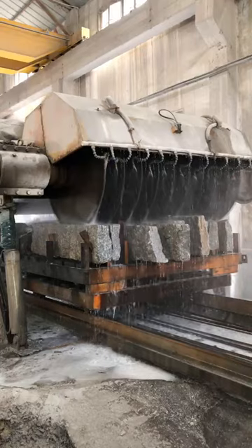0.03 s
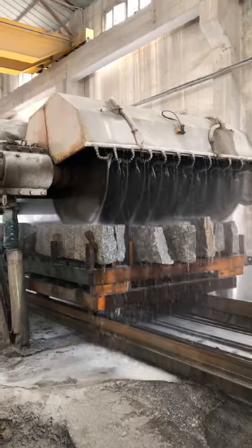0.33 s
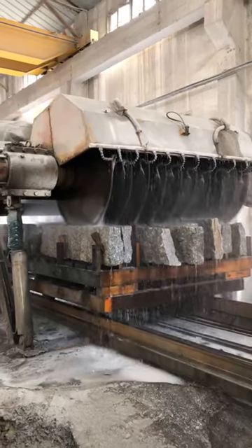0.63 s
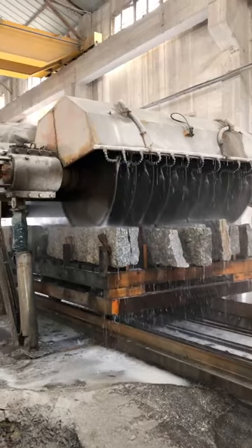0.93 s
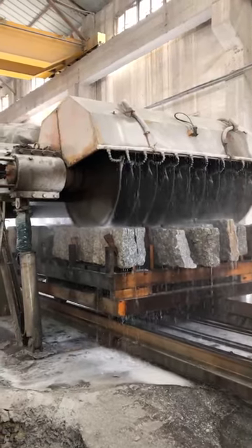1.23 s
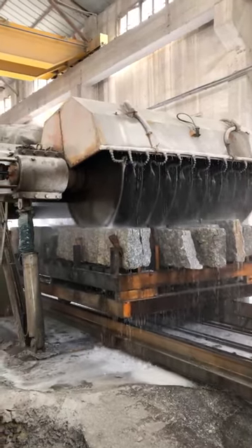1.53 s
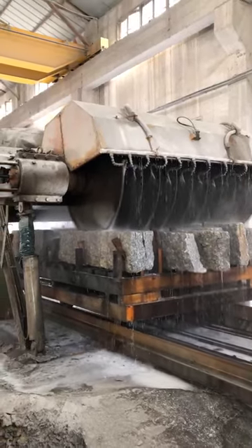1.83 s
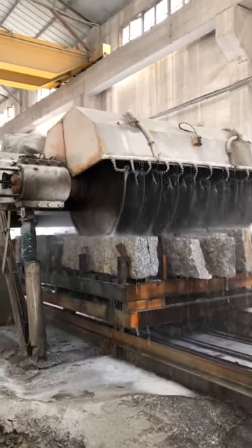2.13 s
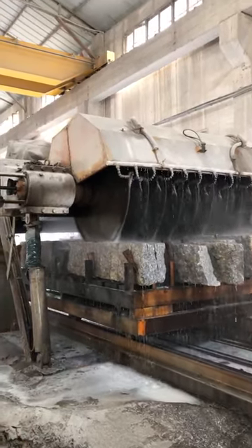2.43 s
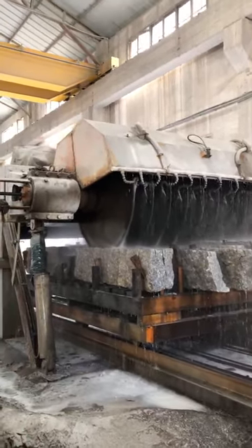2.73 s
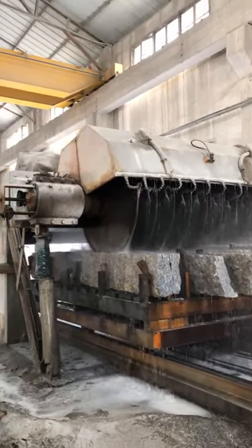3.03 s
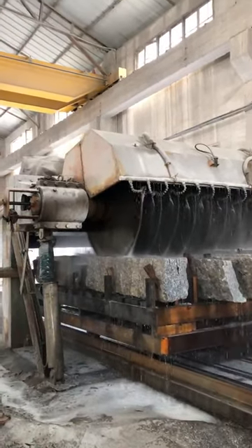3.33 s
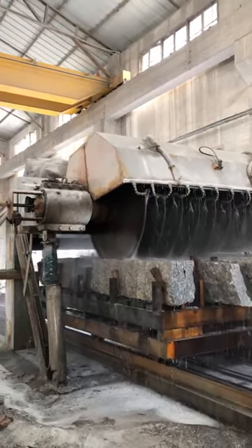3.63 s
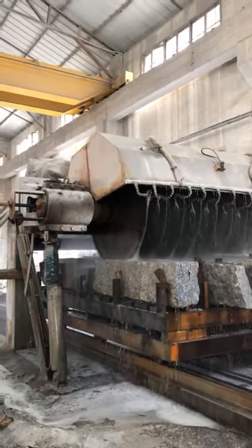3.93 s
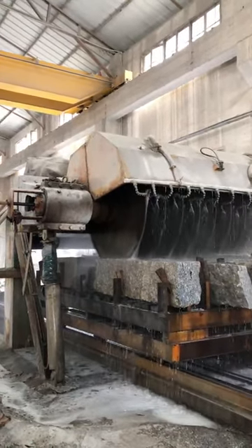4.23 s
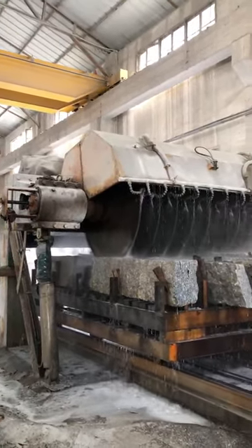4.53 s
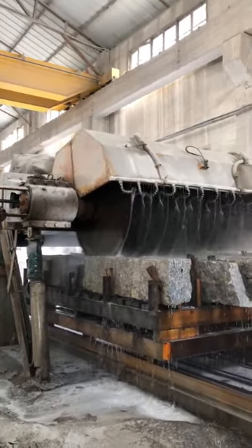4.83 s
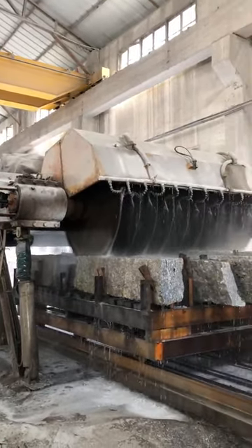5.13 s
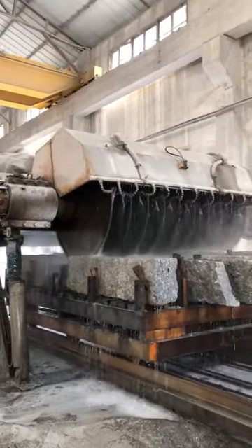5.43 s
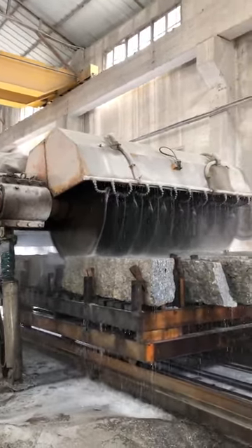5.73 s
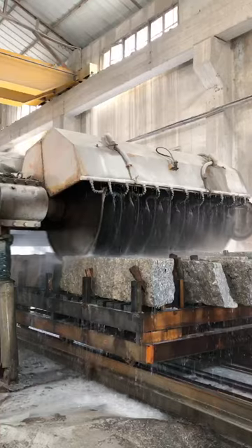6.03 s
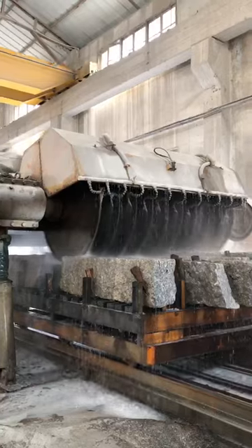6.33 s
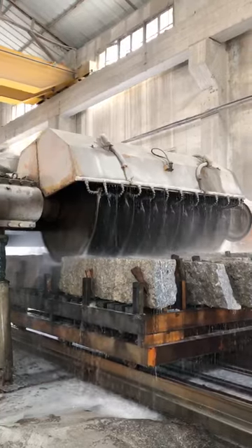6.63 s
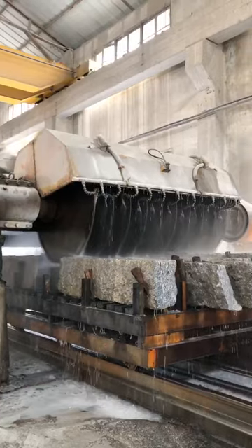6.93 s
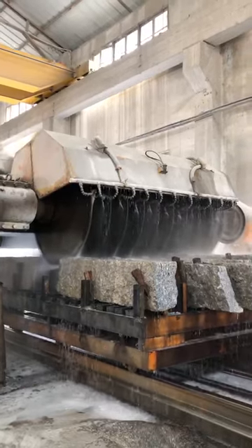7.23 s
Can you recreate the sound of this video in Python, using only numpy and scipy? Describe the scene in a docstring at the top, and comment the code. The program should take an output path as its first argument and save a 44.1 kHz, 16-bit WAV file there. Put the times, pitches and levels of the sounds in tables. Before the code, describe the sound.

A large multi-blade circular saw cuts granite under running water in a concrete hall. A harsh, gritty rasp runs from start to finish, fluttering slightly, with bright spray hissing off the blades and the steel discs rattling. Underneath, the shaft hums, the motor whines faintly, one disc sings on and off, and the frame gives a few soft low groans. The sound stays centred and nearly constant in level.

```python
"""Wet saw cutting granite

A multi-blade circular saw grinds through granite under running water, in a concrete hall.
The segments bite in a pattern that returns with every turn and shakes frame, hood and discs.
Crushed grit rasps in fluttering surges and spray hisses off the rims. Underneath, the shaft hums,
the motor whines, one disc sings on and off, and the frame gives brief low groans."""
import sys
import numpy as np
from scipy import signal
from scipy.fft import rfft, irfft
from scipy.io import wavfile
from scipy.ndimage import uniform_filter1d

SR = 44100
rng = np.random.default_rng(int(sys.argv[2]) if len(sys.argv) > 2 else 0)


def master_out(mix):
    """Clip the mix to full scale and print it as 16-bit PCM to the path in sys.argv[1]."""
    frames = np.transpose(np.atleast_2d(mix))
    ceiling = np.clip(frames, -1, 1)
    pcm = np.round(ceiling * 32767).astype(np.int16)
    wavfile.write(sys.argv[1], SR, pcm)


N = 329868
T = np.arange(N) / SR
FREQ = np.maximum(np.arange(N // 2 + 1) * SR / N, 1)
TURN_HZ = 6.428  # blade turns per second

# how hard the blades press into the stone: (time [s], load [dB])
CUT_LOAD = [(0.0, -1), (0.25, -0.7), (0.62, 0.9), (0.92, -0.4), (1.25, -0.5), (1.65, -1.2), (2.2, 0.3),
            (2.5, -0.1), (2.85, 1.3), (3.1, 0.8), (3.7, 0.3), (3.98, 0), (4.5, 0.2), (4.95, 0.5),
            (5.45, 0.4), (5.75, -0.5), (6.25, -0.2), (6.6, -0.5), (7.4, -1)]
# upper modes of the steel discs: (frequency [Hz], width [Hz], lift [dB])
STEEL_MODES = [(860, 25, 5), (1090, 70, 6), (1127, 43, 5), (1184, 37, 3), (1300, 44, 3), (1648, 104, 5),
               (1774, 73, 4), (2287, 87, 4.5), (2465, 120, 3.5), (2590, 60, 2), (2790, 80, 2.5),
               (2925, 45, 1.5), (3010, 60, 3.5), (3210, 87, 3.6), (3420, 48, 3.5), (3530, 52, 1.5),
               (3640, 55, 1.4), (4004, 59, 1.5), (4200, 140, 2.5), (4680, 54, 0), (5140, 70, 2),
               (5630, 60, 0.7), (6050, 130, 2.5), (6260, 130, 3), (7150, 80, 1), (8060, 83, 0)]
# tone colours of disc rattle, grit, spray and frame: (frequency [Hz], relative level [dB])
RATTLE_SPECTRUM = [(260, -10), (310, -4), (390, -3), (470, -8), (600, -3), (720, -3), (830, -10),
                   (1000, -4.5), (1200, -6), (1480, -6.5), (1700, -5), (2000, -2.5), (2300, -4),
                   (3000, -15.5)]
RASP_SPECTRUM = [(1600, -28), (2050, -8.5), (2300, -5.5), (2650, 1), (3100, 2), (3600, 2), (4100, -6),
                 (4700, -7.5), (6000, -5), (10000, -10.5)]
SPRAY_SPECTRUM = [(2500, -15.5), (3800, -2), (4700, -1.5), (5600, -1), (6500, -1.5), (8000, -0.5),
                  (9500, -1), (11200, -1.5), (12200, -4.5), (12900, -5), (13400, -16), (14100, -14)]
FRAME_SPECTRUM = [(30, -19), (50, -8), (65, -11), (78, -5), (100, 3), (122, 2), (160, 2.5), (200, 0),
                  (245, 0), (300, 1.5), (380, -2.5), (450, -20)]
# fader rides for frame rumble, hood drone and the discs' main ring: (time [s], level [dB])
RUMBLE_FADER = [(0, -45), (1.2, -46.5), (2.1, -46), (3.0, -46.5), (4.85, -46.5), (5.35, -41.5), (5.9, -45),
                (7.45, -42.5)]
HOOD_FADER = [(0, -43), (.3, -52), (.62, -40), (.95, -49), (1.3, -44), (1.7, -45), (1.9, -37.5),
              (2.15, -41.5), (2.35, -41.5), (2.62, -39.5), (2.85, -45), (3.45, -43.5), (4.1, -41.5),
              (4.4, -50), (5.0, -47), (5.3, -44), (5.9, -45.5), (6.3, -41.5), (6.9, -47), (7.45, -48)]
RING_FADER = [(0, -43), (.55, -45), (.97, -35.5), (1.4, -42), (1.95, -42), (2.4, -43.5), (2.58, -37.5),
              (3.0, -40.5), (3.45, -42.5), (3.65, -39.5), (4.15, -37), (4.85, -44), (5.3, -42),
              (5.78, -38.5), (6.0, -41.5), (6.5, -39.5), (6.8, -43.5), (7.45, -44)]
# fader rides for the shaft's two main hums and the motor whine: (time [s], level [dB])
LOW_HUM_FADER = [(0.0, -55), (1.1, -49), (3.5, -51.2), (4.5, -57), (5.35, -48), (7.4, -54)]
HIGH_HUM_FADER = [(0.0, -56), (1.1, -68), (1.72, -50.5), (2.2, -48), (2.55, -51), (2.95, -48), (3.6, -49.5),
                  (4.6, -44.5), (4.87, -57), (5.2, -49), (6.2, -55), (7.4, -56)]
WHINE_FADER = [(0, -56), (.7, -53), (1.15, -47), (1.6, -50), (2.1, -54), (2.5, -46), (3.1, -57), (3.5, -49),
               (4.1, -56), (5.2, -51), (5.85, -47.5), (6.5, -50), (6.75, -44.5), (7.45, -47)]
# faint steady hums of the shaft: (order [multiple of the turn rate], level [dB])
SHAFT_ORDERS = [(9, -67), (12, -64), (13, -56), (14, -61), (18, -61.5)]
# the motor's cluster of tones and an overtone: (frequency [Hz], relative level [dB])
WHINE_PARTIALS = [(514.3, 0.5), (521, -3), (527, -6.5), (1028.6, -3)]
# the singing disc's line: (time [s], pitch [Hz], level [dB])
DISC_SONG = [(0, 559, -37), (.42, 556, -41.5), (.65, 564, -41.5), (.85, 563, -40), (.98, 556, -54),
             (1.1, 553, -44), (1.27, 553, -41), (1.38, 560, -50), (1.5, 565, -43.5), (1.75, 557, -50),
             (2.3, 562, -47), (2.85, 560, -50), (3.4, 558, -42.5), (3.75, 553, -48), (4.45, 564, -53),
             (4.58, 563.5, -36), (4.85, 560, -46), (5.03, 562, -42), (5.2, 562, -48), (6.4, 566, -55),
             (7.0, 559, -46), (7.45, 557, -41)]
# groans of the frame: (peak time [s], pitch [Hz], half length [s], peak level [dB])
FRAME_GROANS = [(.22, 169, 0.19, -48), (1.05, 169.6, 0.38, -53.5), (3.38, 86.7, .14, -52),
                (4.95, 84, .2, -55), (5.146, 157, .12, -44), (5.72, 83.2, .13, -48), (6.048, 85, .14, -49)]


def undb(db):
    """Decibels to gain."""
    return 10 ** (np.asarray(db) / 20)


def unit(x):
    """Scale to rms 1."""
    return x / np.sqrt(np.mean(x ** 2))


def curve(table):
    """A (time, value) table as one value per sample."""
    return np.interp(T, *np.transpose(table))


def shape(x, gain):
    """Filter by a gain per frequency."""
    return irfft(rfft(x) * gain, N)


def colour(points):
    """EQ curve through a spectrum table, falling 12 dB an octave beyond its ends."""
    hz, db = np.transpose(points)
    ends = np.minimum(1, np.minimum(FREQ / hz[0], hz[-1] / FREQ)) ** 2
    return ends * undb(np.interp(np.log(FREQ), np.log(hz), db))


def resonance(hz, width_hz):
    """Response of one damped mode, 1 at its centre."""
    return 1 / (1 + 1j * (FREQ ** 2 - hz ** 2) / (FREQ * width_hz))


def walk(rate_hz):
    """Smooth random drift up to about rate_hz, rms 1."""
    return unit(shape(rng.standard_normal(N), 1 / (1 + (FREQ / rate_hz) ** 2) * (FREQ > 1)))


def flutter(rate_hz):
    """Random drift with the slow swells taken out, rms 1."""
    return unit(shape(walk(rate_hz), 1 / (1 + (1.8 / FREQ) ** 4)))


def tone(hz, waver):
    """A sine of rms 1 whose phase wanders by waver radians."""
    return np.sqrt(2) * np.sin(2 * np.pi * (hz * T + rng.random()) + waver * walk(1.4))


def impacts(per_s, spread_db, hall_db=-3):
    """A hail of tiny clicks over a noise bed, the diffuse wash of the concrete walls."""
    struck = rng.random(N) < per_s / SR
    clicks = unit(struck * rng.choice([-1, 1], N) * undb(spread_db * rng.standard_normal(N)))
    return unit(clicks + undb(hall_db) * rng.standard_normal(N))


def bite(repeat_hz):
    """Force of the segments on stone: lows under repeat_hz loop each turn, the highs are always new."""
    orders = int(SR / TURN_HZ) // 2 + 1
    one_turn = unit(irfft(np.exp(2j * np.pi * rng.random(orders))))  # all orders equally strong
    loop_share = 1 / (1 + FREQ / repeat_hz)
    looped = shape(np.resize(one_turn, N), np.sqrt(loop_share))
    fresh = shape(impacts(per_s=12000, spread_db=0), np.sqrt(1 - loop_share))
    return looped + fresh


def chip_pings(per_s, t60_s, low_hz, high_hz, spread_db):
    """Stone chips hit the discs; each sets one of their countless modes ringing briefly."""
    age = T[:2600]
    fade = np.exp(-np.log(1000) * age / t60_s)
    out = np.zeros(N + len(age))
    for when, pitch, size in rng.random((int(per_s * N / SR), 3)):
        hz = low_hz * (high_hz / low_hz) ** pitch
        start = int(when * N)
        out[start:start + len(age)] += undb(spread_db * size) * fade * np.sin(2 * np.pi * hz * age)
    return unit(out[:N])


def cutting(rattle_db, rasp_db, spray_db):
    """Segments rattle the discs, grit cracks against the steel, and water is flung off the rims."""
    steel = undb(sum(db * np.abs(resonance(hz, width)) ** 2 for hz, width, db in STEEL_MODES))
    chatter_db = 0.5 * flutter(24)  # fluttering contact pressure moves all three layers together
    force = bite(repeat_hz=220) * undb(chatter_db)
    rattle = unit(shape(force, colour(RATTLE_SPECTRUM) * steel))
    chips = chip_pings(per_s=350, t60_s=0.19, low_hz=2190, high_hz=9020, spread_db=4.5)
    grit = impacts(per_s=12000, spread_db=2.5) * undb(chatter_db + 0.18 * walk(45))
    rasp = unit(shape(grit + undb(-22) * chips, colour(RASP_SPECTRUM) * steel))
    drops = impacts(per_s=25000, spread_db=4) * undb(chatter_db + 0.69 * walk(24))
    spray = unit(shape(drops + undb(-10.5) * chips, colour(SPRAY_SPECTRUM) * steel))
    return rattle * undb(rattle_db) + rasp * undb(rasp_db) + spray * undb(spray_db)


def shimmer(x, depth_db=0.95, memory_s=0.035):
    """As the contact points shift, each of the discs' close-lying modes swells and fades on its own."""
    bands = signal.stft(x, nperseg=1024)[2]
    carry = np.exp(-512 / SR / memory_s)  # per hop of 512 samples
    jitter = uniform_filter1d(rng.standard_normal(bands.shape), size=2, axis=0)
    drift = unit(signal.lfilter([1], [1, -carry], jitter))
    return signal.istft(bands * unit(undb(depth_db * drift)))[1][:N]


def throb(hz, depth, swing_hz, waver):
    """A tone that swells and bends in pitch with every turn of the blades, never twice quite alike."""
    turn = 2 * np.pi * (TURN_HZ * T + rng.random()) + 0.55 * walk(3)
    bend_hz = swing_hz * np.sin(turn) * (1 + 0.42 * walk(2.3))
    bend_hz -= uniform_filter1d(bend_hz, size=int(SR / TURN_HZ))  # keeps the note centred
    phase = 2 * np.pi * (hz * T + rng.random() + np.cumsum(bend_hz) / SR)
    swell = np.maximum(1 + depth * np.cos(turn), 0)
    return unit(np.sin(phase + waver * walk(1.2)) * swell)


def machine_body(rumble_db, drone_db, ring_db):
    """The bite shakes the frame and rings hood and discs, each ring rough around a throbbing core."""
    force = bite(repeat_hz=250)
    rumble = unit(shape(force, colour(FRAME_SPECTRUM))) * undb(rumble_db)
    hood = unit(shape(force, resonance(342.2, width_hz=34) ** 2))
    hood += undb(0.5) * throb(340.7, depth=0.49, swing_hz=5.7, waver=0.58)
    ring = unit(shape(force, resonance(661.4, width_hz=44) ** 2))
    ring += undb(2) * throb(661.8, depth=1.05, swing_hz=8, waver=0.47)
    # rough undertone of the singing disc
    murmur = unit(shape(force, resonance(550, width_hz=43) ** 2)) * undb(-50.5)
    return rumble + unit(hood) * undb(drone_db) + unit(ring) * undb(ring_db) + murmur


def drive(low_db, high_db, whine_db):
    """The shaft hums on multiples of its turn rate; the motor whines with a slight waver."""
    low = undb(low_db) * tone(10 * TURN_HZ, waver=0.1)
    flutter_db = 1.5 * walk(6)
    high = undb(high_db + flutter_db) * tone(19 * TURN_HZ, waver=0.71)
    faint = sum(undb(db) * tone(order * TURN_HZ, waver=0.68) for order, db in SHAFT_ORDERS)
    whine = sum(undb(whine_db + db) * tone(hz, waver=0.65) for hz, db in WHINE_PARTIALS)
    return low + high + faint + whine


def singing_disc():
    """A disc sings in the cut; its note slides a little, comes and goes, and pulses with each turn."""
    times, hz, db = np.transpose(DISC_SONG)
    phase = 2 * np.pi * np.cumsum(np.interp(T, times, hz)) / SR + 0.28 * walk(4.1)
    tremolo = 1 + 0.13 * tone(TURN_HZ, waver=0.75)
    return np.sqrt(2) * undb(np.interp(T, times, db)) * np.sin(phase) * tremolo


def frame_groans():
    """The frame groans: low tones that swell and die away within a few turns."""
    return sum(undb(db) * np.exp(-((T - peak_s) / half_s) ** 2) * tone(hz, waver=0.34)
               for peak_s, hz, half_s, db in FRAME_GROANS)


def scene():
    """The whole saw, panned centre; the load rides rattle and rasp, and nudges the spray."""
    load_db = curve(CUT_LOAD)
    spray_db = -17.5 + 0.13 * load_db - 0.08 * T  # the hiss slowly eases off
    cut = shimmer(cutting(rattle_db=-30 + load_db, rasp_db=-22 + load_db, spray_db=spray_db))
    body = machine_body(curve(RUMBLE_FADER), curve(HOOD_FADER), curve(RING_FADER))
    hum = drive(curve(LOW_HUM_FADER), curve(HIGH_HUM_FADER), curve(WHINE_FADER))
    mono = cut + body + hum + singing_disc() + frame_groans()
    return np.array([mono, mono])


def record(dry):
    """A very short echo combs the treble slightly hollow; the sound cuts in hard, its top rolled off."""
    comb_spacing_hz, start_s, top_hz = 806, 0.0355, 14100
    echo = np.exp(-2j * np.pi * FREQ / comb_spacing_hz)
    depth = 0.42 / (1 + (5500 / FREQ) ** 4)
    hollow = shape(dry, (1 + depth * echo) / np.sqrt(1 + depth ** 2))
    lowpass = signal.ellip(12, 0.2, 80, top_hz, fs=SR, output="sos")
    return signal.sosfilt(lowpass, hollow * (T > start_s))


dry = scene()
out = record(dry)
master_out(out)
```